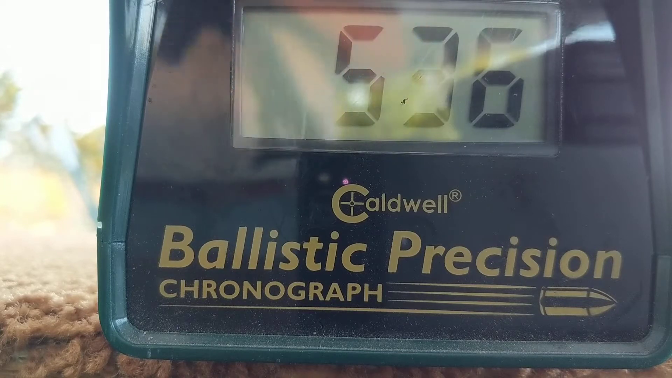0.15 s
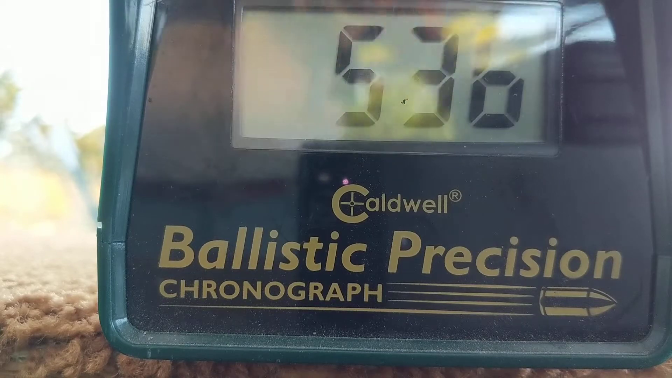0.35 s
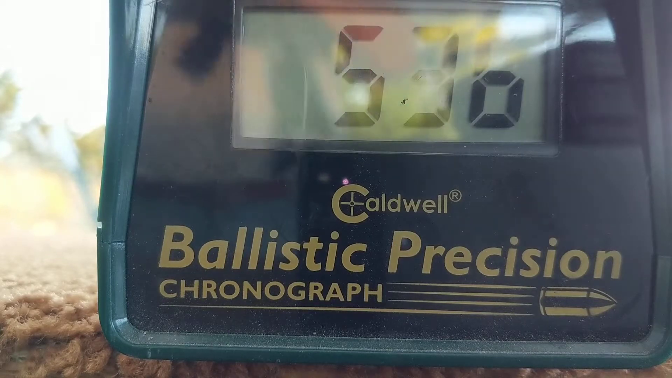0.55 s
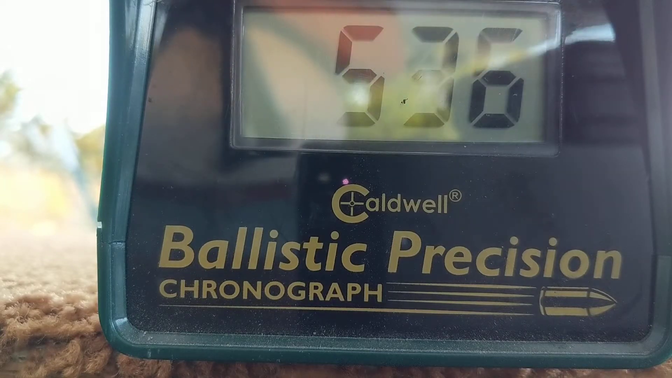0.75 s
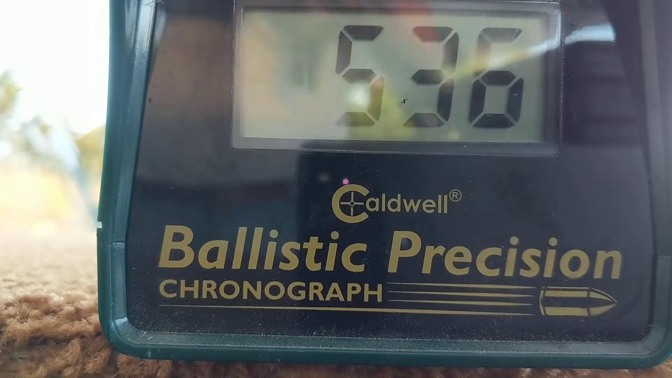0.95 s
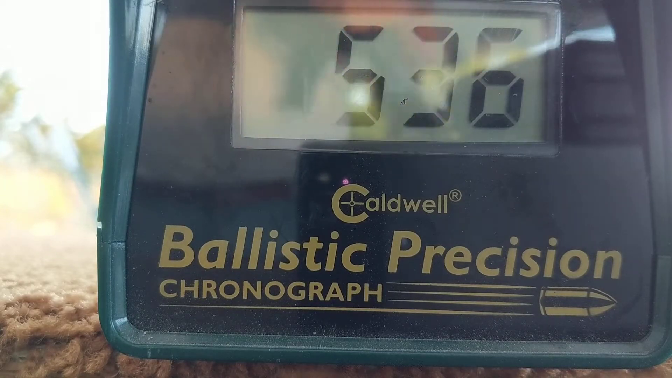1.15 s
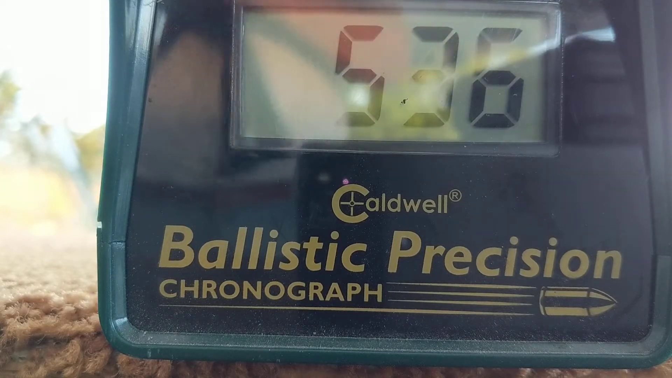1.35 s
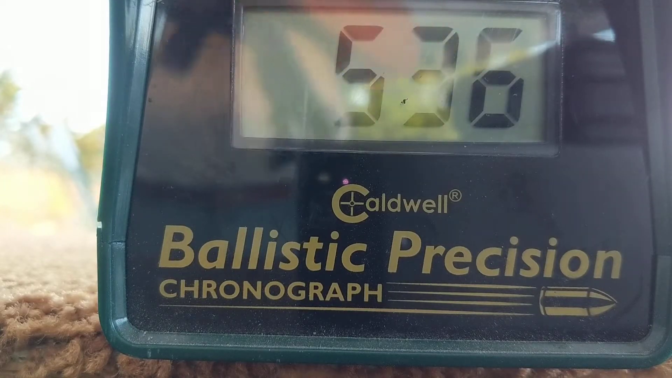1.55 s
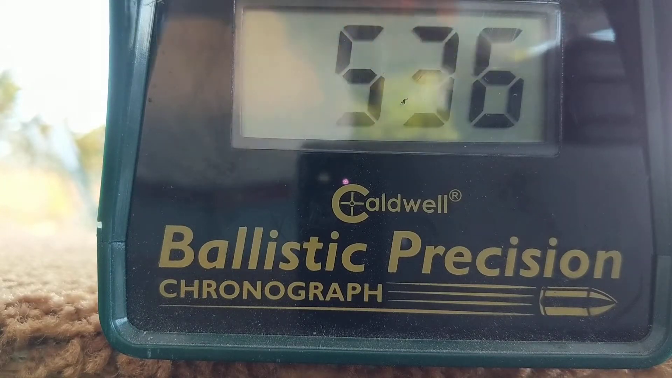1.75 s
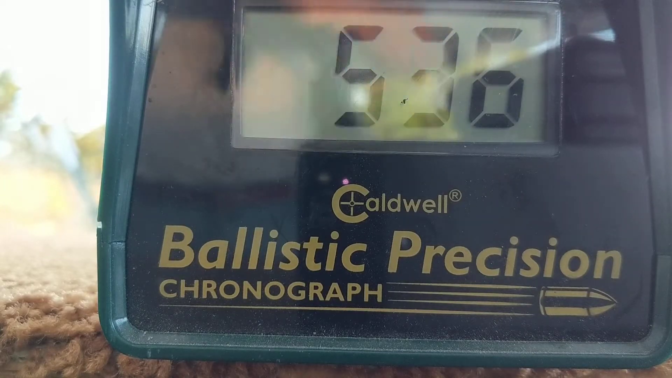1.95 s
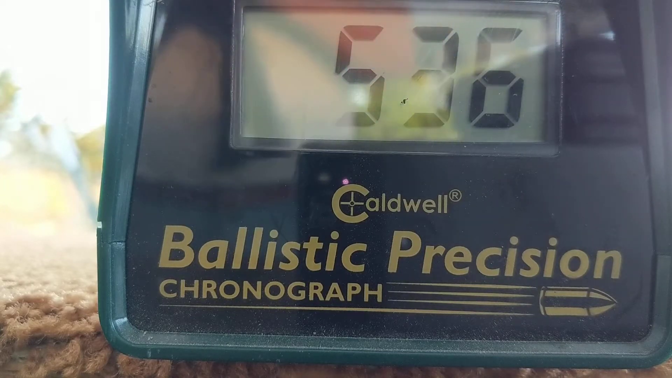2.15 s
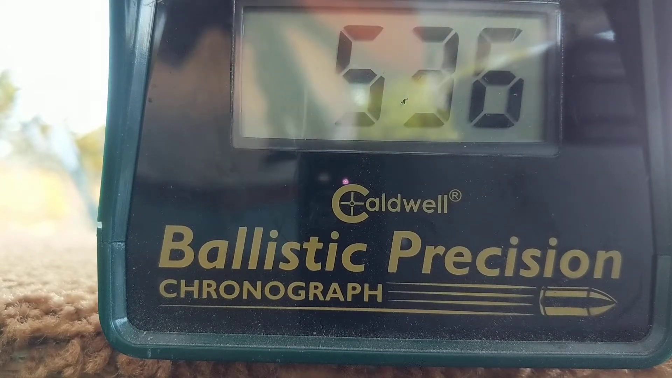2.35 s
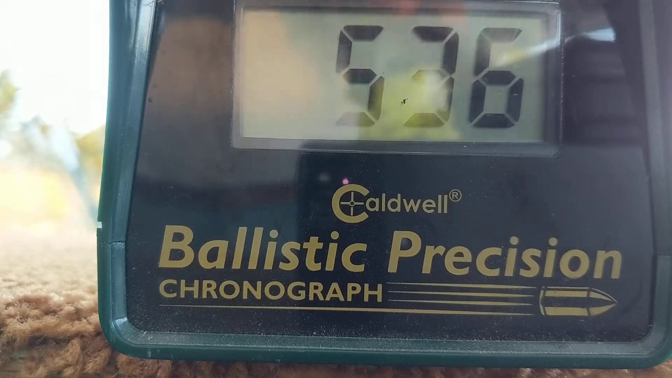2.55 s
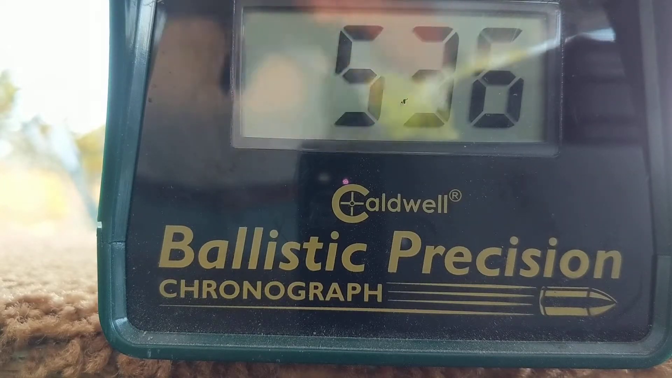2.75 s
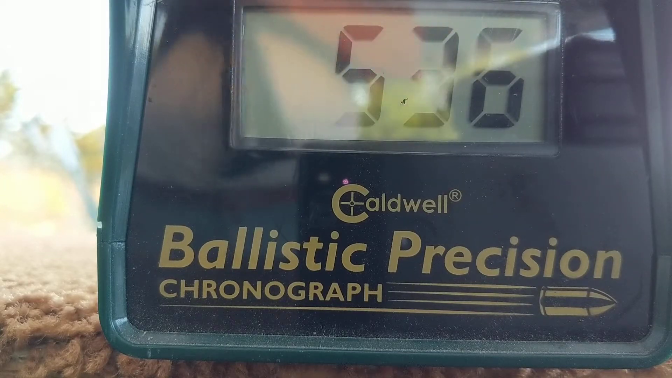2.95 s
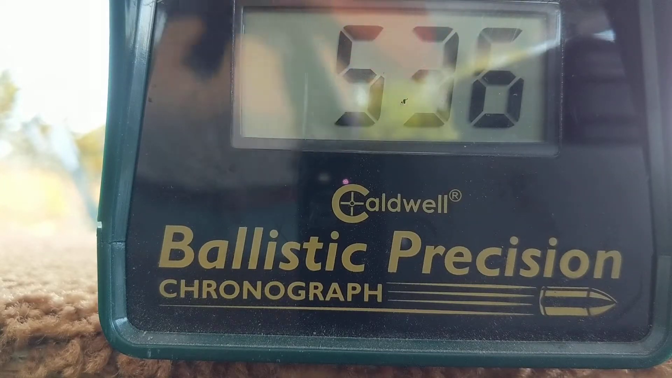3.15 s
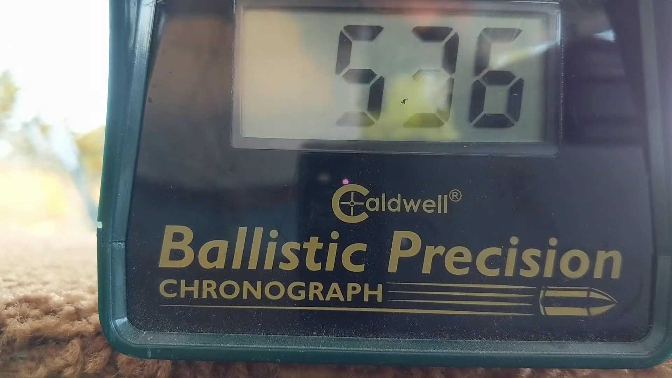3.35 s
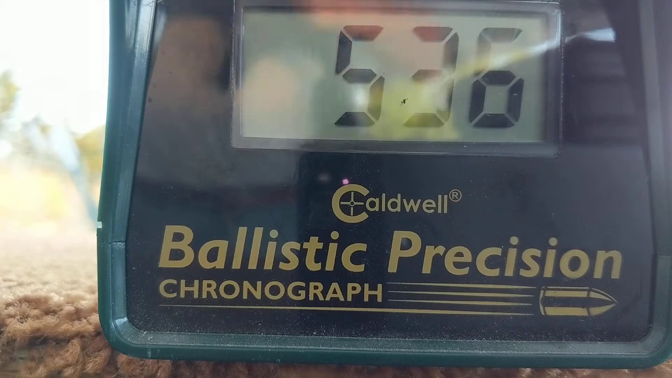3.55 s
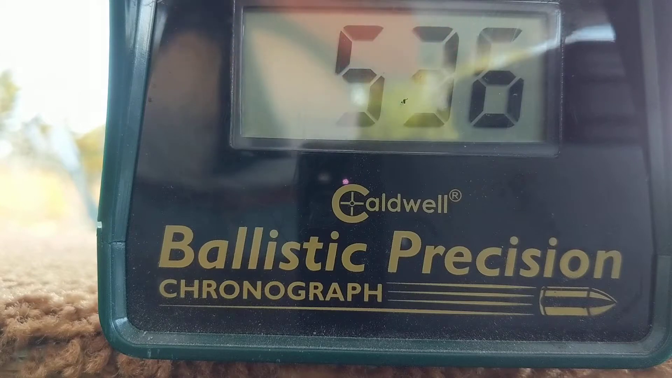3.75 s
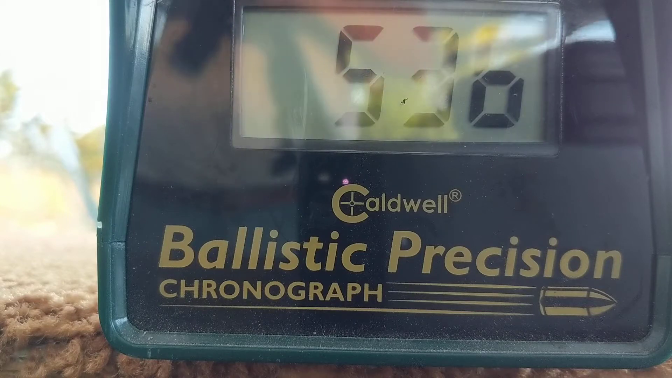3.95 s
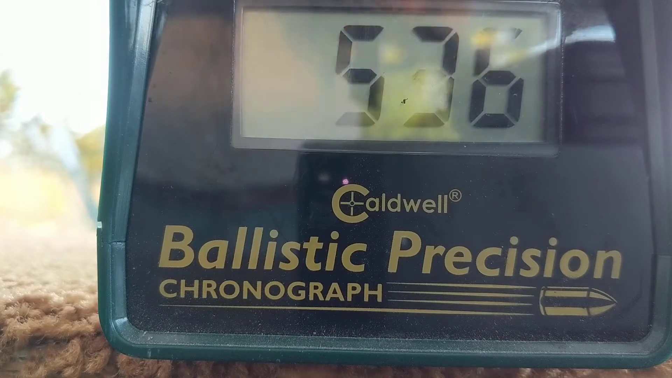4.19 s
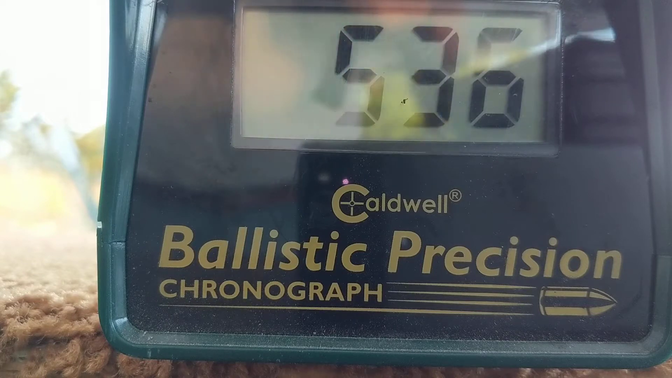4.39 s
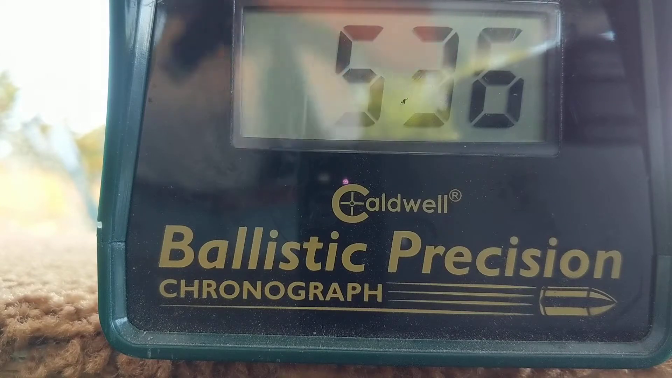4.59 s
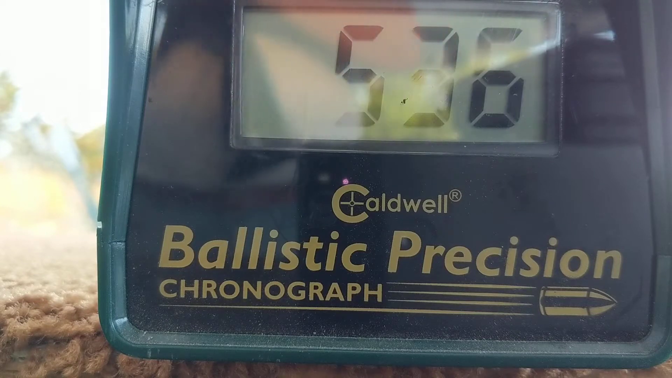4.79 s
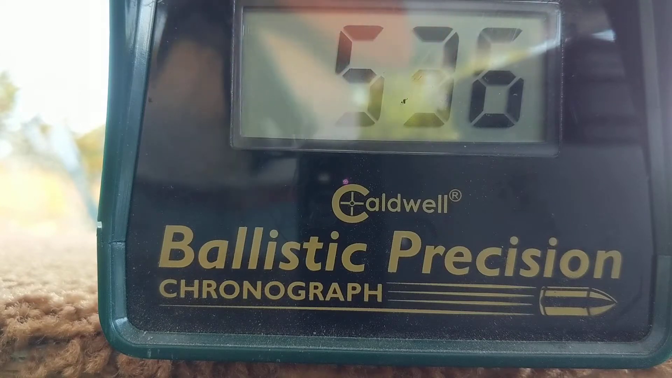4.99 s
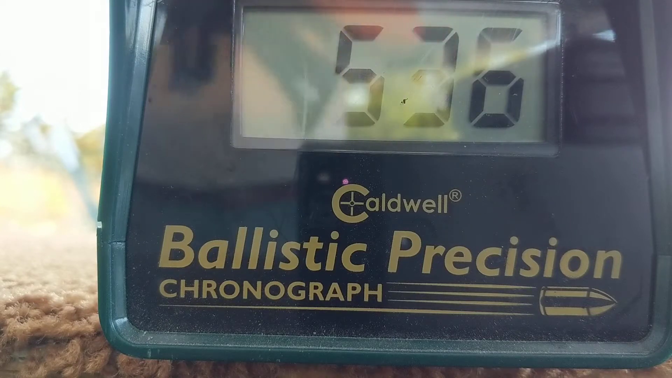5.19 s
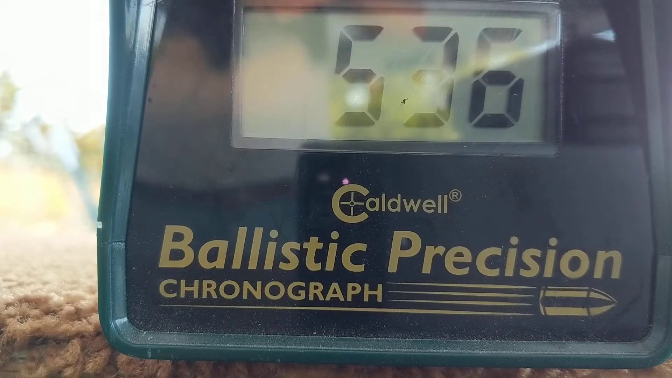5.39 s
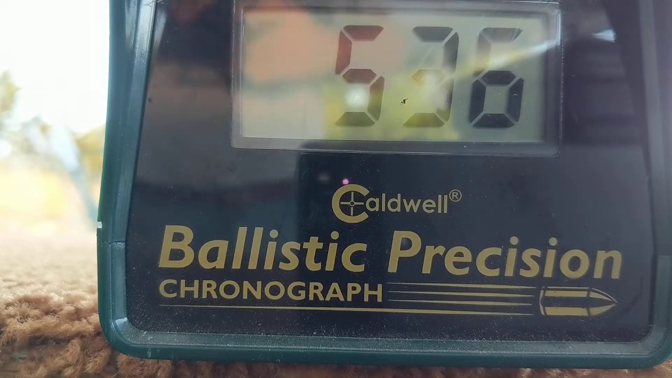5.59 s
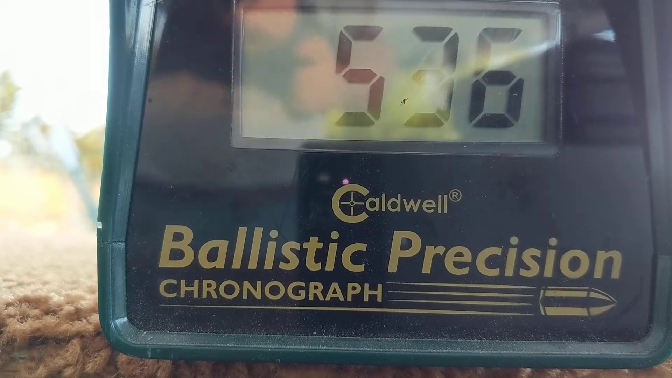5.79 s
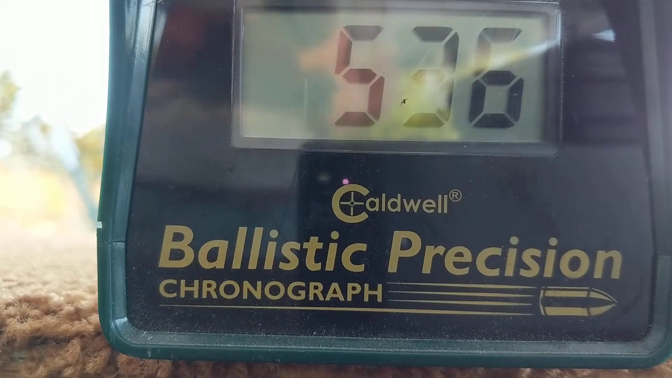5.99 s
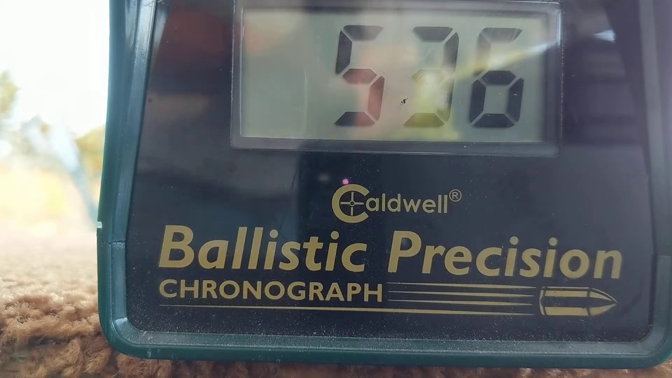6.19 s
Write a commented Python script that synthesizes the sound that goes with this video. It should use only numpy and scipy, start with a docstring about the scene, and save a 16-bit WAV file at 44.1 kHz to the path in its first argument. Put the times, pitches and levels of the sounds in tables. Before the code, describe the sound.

Sharp, evenly paced clacks of an air rifle's pump lever snapping open and slamming shut, over a quiet outdoor hush.

```python
"""Pumping an air rifle on a porch

On each stroke the lever pops off its catch, slides open to its stop and slams shut on the pump tube.
Each impact is a burst of contacts that excites the rifle's damped modes; the porch reflects it.
Friction hisses, hands and linkage tick, and a breeze rumbles on the microphone over an outdoor hush."""
import sys
import numpy as np
from scipy import signal
from scipy.io import wavfile

SR = 44100
rng = np.random.default_rng(int(sys.argv[2]) if len(sys.argv) > 2 else 0)


def int16_out(signal):
    """Quantize to a 16-bit WAV file."""
    q = np.round(np.clip(np.atleast_2d(signal).T, -1, 1) * 32767)
    wavfile.write(sys.argv[1], SR, q.astype(np.int16))


N = 274831

# lever striking the tube: start_s, level_db, rattle_t60_s, body_db, bright_db, focus_hz, thump_db, ring_db
SLAMS = [(0.0803, -2.5, .027, 4.5, -1, 608, -28, -30), (0.757, -.5, .024, .5, -0.5, 2500, -15, -32),
         (1.4647, -2, .036, -2, -2, 1760, -29, -22), (2.2553, -3, .04, 4, -3, 2070, -33, -28),
         (3.0206, -2, .033, 2, -1, 1300, -31, -28), (3.7965, -1.5, .036, 5.5, -7, 1420, -29, -25),
         (4.8738, -2.5, .042, 4, 1.5, 1810, -21, -19)]
# lever reaching its stop: start_s, level_db, rattle_t60_s, body_db, bright_db, focus_hz
OPEN_STOPS = [(.412, -25, .06, 2.5, 3, 1940), (1.104, -23, .063, -.5, 2, 2100),
              (1.834, -21.5, .05, 3, 1.5, 2100), (2.6205, -24, .06, 1.5, 1.5, 2900),
              (3.418, -26.5, .06, -.5, .5, 2350), (4.29, -25, .052, 2, 8, 2100)]
# spectrum of light metal contacts: frequency_hz, density_db
TICK_SPECTRUM = [(180, -40.5), (300, -14), (1340, -3), (2030, 0), (2570, -9), (3030, 3.5), (4300, -10.5),
                 (6000, -1), (6620, -19), (9550, -19.5), (16000, -57.5)]
SLAM_KNOCK_DELAY_S = .0033
EDGES_HZ = 22 * 2 ** np.arange(0, 9.7, 1 / 3)   # third-octave bands
CENTRES_HZ = np.sqrt(EDGES_HZ[:-1] * EDGES_HZ[1:])
BANDS = [signal.butter(2, pair, "band", fs=SR, output="sos") for pair in zip(EDGES_HZ, EDGES_HZ[1:])]


def from_db(db):
    """Decibels to amplitude ratio."""
    return 10 ** (np.asarray(db) / 20)


def unit_rms(x):
    """Normalisation to unit mean power."""
    return x / np.sqrt(np.mean(x ** 2) + 1e-20)


def butterworth(x, order, hz, kind):
    """Filtering with a maximally flat passband."""
    return signal.sosfilt(signal.butter(order, hz, kind, fs=SR, output="sos"), x)


def band_levels_db(spectrum):
    """Log-frequency interpolation of a spectrum at the band centres."""
    hz, db = np.transpose(spectrum)
    return np.interp(np.log(CENTRES_HZ), np.log(hz), db, left=-90)


def drift(rate_hz):
    """Low-passed Gaussian noise: a slow fluctuation of unit rms."""
    hop, settling = 40, 2000
    pole = np.exp(-2 * np.pi * rate_hz * hop / SR)
    white = rng.standard_normal(N // hop + settling + 2)
    slow = signal.lfilter([1], [1, -2 * pole, pole * pole], white)[settling:]
    return np.interp(np.arange(N) / hop, np.arange(len(slow)), unit_rms(slow))


def grains(size, spread_db):
    """Heavy-tailed noise: dense impulses of uneven strength."""
    return rng.standard_normal(size) * from_db(spread_db * np.minimum(rng.exponential(1, size), 5))


def ring(force, hz, t60_s):
    """Damped oscillator: a unit impulse starts a decaying sine of unit amplitude."""
    r, w = from_db(-60 / (t60_s * SR)), 2 * np.pi * hz / SR
    return signal.lfilter([0, np.sin(w)], [1, -2 * r * np.cos(w), r * r], force + 1e-18)


def resonance(x, hz, width_hz):
    """Two-pole resonator with unit gain at its peak."""
    r, w = np.exp(-np.pi * width_hz / SR), 2 * np.pi * hz / SR
    return signal.lfilter([(1 - r * r) / 2, 0, (r * r - 1) / 2], [1, -2 * r * np.cos(w), r * r], x)


def band_noise(spectrum, flicker_db, grain_db, rate_hz):
    """Noise of unit rms whose bands undergo partly correlated amplitude modulation."""
    out, common = np.zeros(N), drift(rate_hz)
    white = [grains(N, grain_db), grains(N, grain_db)]
    for k, db in enumerate(band_levels_db(spectrum)):
        if db > -89:
            flicker = 0.48 * common + drift(rate_hz)
            out += from_db(db + flicker_db * flicker) * signal.sosfilt(BANDS[k], white[k % 2])
    return unit_rms(out)


def outdoor_hush():
    """Ambient noise: a faint broadband floor that wavers slowly."""
    # outdoor background: frequency_hz, density_db
    spectrum = [(59, -33.5), (100, -5), (310, -8.5), (600, -11), (1000, -16), (1350, -18), (1870, -17),
                (2260, -31), (5670, -20.5), (7020, -36), (9270, -35.5), (15100, -36), (16500, -56.5)]
    return from_db(-65.5) * band_noise(spectrum, flicker_db=2.8, grain_db=0.2, rate_hz=6)


def breeze():
    """Turbulence at the microphone: low-frequency pressure fluctuations that rise with each gust."""
    # gust envelope: time_s, level_db
    gusts = [(0.0, -47), (0.06, -44), (0.15, -62), (0.19, -44), (0.26, -47), (0.29, -33), (0.4, -36),
             (0.43, -47), (0.6, -47), (0.635, -38), (0.72, -51), (0.83, -61), (1.05, -57), (1.8, -55),
             (2.3, -61), (2.9, -55), (3.1, -64), (3.35, -55), (3.9, -61), (4.3, -56), (5.3, -61),
             (5.65, -59), (5.75, -51), (5.85, -59), (6.23, -53)]
    # wind rumble: frequency_hz, density_db
    spectrum = [(12, -45), (20, -14.5), (48, -2), (86, 0), (128, -10.5), (168, -10.5), (340, -32),
                (500, -44), (650, -63.5), (1100, -120)]
    envelope = from_db(np.interp(np.arange(N) / SR, *np.transpose(gusts)))
    return envelope * band_noise(spectrum, flicker_db=3.3, grain_db=1.0, rate_hz=12)


def air_puffs():
    """Pressure transients: each puff is a dull kick followed by a low, damped swing back."""
    # pops of air on the microphone: start_s, strength_db
    puffs = [(0.297, -40.5), (0.344, -44), (0.375, -39), (0.628, -43), (5.474, -39.5), (5.498, -54),
             (6.082, -47)]
    impulses = np.zeros(N)
    for start_s, strength_db in puffs:
        impulses[round(start_s * SR)] = -from_db(strength_db + 11)
    pole = np.exp(-2 * np.pi * 1100 / SR)   # low-pass corner at 1100 Hz
    kick = signal.lfilter([1 - pole], [1, -2 * pole, pole * pole], impulses)
    return kick - from_db(-18) * ring(impulses, hz=65, t60_s=.05)


def friction_envelope():
    """Incoherent sources add in power: piston strokes and hand grips each swell and fade."""
    # piston travel: start_s, opening_db, closing_db, closing_fade_db_per_s
    strokes = [(.3, -55, -62, 60), (.985, -55, -56, 65), (1.71, -52, -50, 55), (2.49, -55, -56, 110),
               (3.31, -53, -59, 20), (4.19, -53, -59, 60)]
    # hands shifting on stock and lever: start_s, length_s, level_db
    grips = [(.17, .05, -62), (.57, .18, -60), (.86, .05, -61), (1.3, .12, -60), (1.56, .07, -62),
             (2.09, .02, -57), (2.36, .06, -64), (2.82, .13, -62), (3.66, .09, -65), (3.86, .08, -64),
             (4.0, .09, -60), (4.5, .2, -68), (5.18, .15, -63), (5.66, .1, -63), (5.98, .2, -68),
             (6.19, .04, -64)]
    attack_s, sag_db_per_s, release_db_per_s, resting_db = .035, 12, 140, -71
    t, power = np.arange(N) / SR, from_db(resting_db) ** 2
    for stroke, (stop_s, *_), (slam_s, *_) in zip(strokes, OPEN_STOPS, SLAMS[1:]):
        start_s, opening_db, closing_db, fade_db_per_s = stroke
        swell = np.clip((t - start_s) / attack_s, 0, 1)
        opening = swell * from_db(opening_db - sag_db_per_s * np.abs(t - start_s))
        closing = (t < slam_s) * from_db(closing_db - fade_db_per_s * np.abs(t - stop_s))
        power += np.where(t < stop_s, opening, closing) ** 2
    for start_s, length_s, level_db in grips:
        swell = np.clip((t - start_s) / attack_s, 0, 1)
        held = from_db(level_db - release_db_per_s * np.maximum(t - start_s - length_s, 0))
        power += (swell * held) ** 2
    return np.sqrt(power)


def rubbing():
    """Sliding friction: hiss and small slips of the linkage excite the pump tube's resonances."""
    # friction noise: frequency_hz, density_db
    spectrum = [(150, -28.5), (250, -0.5), (414, -1.5), (651, 3.5), (1580, -1.5), (1910, -2), (3120, -5),
                (3460, -5.5), (4260, -10.5), (6700, -21.5), (9170, -16), (16000, -48)]
    # air resonances of the pump tube: pitch_hz, width_hz, gain_db
    tube = [(1750, 250, 3.5), (2060, 250, 2), (2640, 300, 1.5), (3600, 220, 5), (5600, 400, 2)]
    slips_per_s, chatter_db = 140, -6
    hiss = band_noise(spectrum, flicker_db=3.0, grain_db=3, rate_hz=55)
    slips = (rng.random(N) < slips_per_s / SR) * grains(N, 1.8)
    chatter = sum(from_db(db) * ring(slips * rng.standard_normal(N), hz, .018) for hz, _, db in tube[:4])
    rush = hiss + sum(from_db(db) * resonance(hiss, hz, width_hz) for hz, width_hz, db in tube)
    return friction_envelope() * unit_rms(unit_rms(rush) + from_db(chatter_db) * unit_rms(chatter))


def impacts(events, spectrum, touch_db, touch_t60_s, delay_s, knock_s, uneven_db, ring_db, focus_db):
    """Impact excitation: a first touch, then a knock that rattles out and rings the rifle's modes."""
    # modes of tube, lever and stock: pitch_hz, level_db, t60_s
    modes = [(603, -32, .025), (1105, -37, .45), (1320, -27, .025), (1590, -11, .07), (1950, -25, .03),
             (2580, -28, .03), (2900, -29, .03), (3650, -27, .025)]
    out, t = np.zeros(N + SR), np.arange(SR // 3) / SR
    bass = CENTRES_HZ < 1100
    treble = np.clip(np.log(CENTRES_HZ / 3000) / np.log(6500 / 3000), 0, 1)
    kick = from_db(14) * (np.arange(len(t)) == round(delay_s * SR))   # the knock's impulse on the modes
    touch = from_db(touch_db - 60 * t / touch_t60_s)
    for event, ringing_db in zip(events, np.broadcast_to(ring_db, len(events))):
        start_s, level_db, rattle_t60_s, body_db, bright_db, focus_hz = event[:6]
        knock = (t >= delay_s) * from_db(-60 * np.maximum(t - delay_s - knock_s, 0) / rattle_t60_s)
        force = (touch + knock) * grains(len(t), 3.5)
        force[0] += 4.0 * touch[0]   # the very first contact is a hard click
        focus = np.exp(-(np.log2(CENTRES_HZ / focus_hz) / 0.2) ** 2)   # the struck part's pitch region
        colour_db = band_levels_db(spectrum) + body_db * bass + bright_db * treble + focus_db * focus
        gains = from_db(colour_db + rng.normal(0, uneven_db, len(BANDS)))
        crack = sum(gain * (-1) ** k * signal.sosfilt(BANDS[k], force[:SR // 8])
                    for k, gain in enumerate(gains) if gain > 1e-3)
        crack = np.pad(crack / np.abs(crack).max(), (0, len(t) - len(crack)))
        ringing = sum(from_db(db + ringing_db + rng.normal(0, 2.5)) * ring(kick, hz, t60_s)
                      for hz, db, t60_s in modes)
        at = round(start_s * SR)
        out[at:at + len(t)] += from_db(level_db) * (crack + ringing)
    return out[:N]


def linkage_ticks():
    """Light impacts: hands and linkage tick, and the lever rebounds once from its open stop."""
    # small contacts: start_s, level_db, rattle_t60_s, body_db, bright_db, focus_hz
    ticks = [(0.315, -36, .05, -2, -3, 2280), (0.325, -34, .09, -10, 9, 3650),
             (0.46, -38, .05, -2, 0, 1680), (0.604, -48, .06, -2, 13, 3470), (0.699, -44, .05, 8, 4, 732),
             (1.007, -40, .04, -8, -1, 2000), (1.017, -36, .055, -12, -1, 3560),
             (1.16, -41, .04, -8, 0, 1700), (1.22, -46.5, .05, -1, -6, 1680),
             (1.284, -50, .03, 8, -12, 800), (1.368, -42.5, .06, -2, 1, 1990),
             (1.742, -38, .05, -2, 0, 3800), (1.754, -37, .08, -2, 1, 3550), (2.095, -32, .06, 0, 7, 2160),
             (2.127, -45, .03, 3, 0, 1100), (2.483, -38, .05, 2, -4, 1950), (2.512, -38, .04, 0, -5, 2830),
             (2.531, -35.5, .05, -3, -10, 2320), (2.542, -36, .05, -11, 0, 2720),
             (2.695, -41, .05, -2, -4.5, 1570), (2.861, -50.5, .06, -4, -2, 1900),
             (3.111, -24, .017, 4, 1.5, 2760), (3.29, -47, .04, -2, -6, 1830),
             (3.323, -36, .04, -9, 9, 1820), (3.486, -41.5, .05, -4, -11, 3700),
             (3.668, -52, .03, -4, -4, 3360), (3.701, -48, .055, -6, 4, 2030),
             (4.023, -44.5, .05, -1, 4, 1180), (4.182, -39, .03, 2, -4, 1180),
             (4.209, -36.5, .09, -7, 1, 2570), (4.39, -44.5, .06, -12, -5, 1560),
             (4.507, -46.5, .05, -2, 0, 2220), (4.58, -48.5, .04, -1, 12, 3500),
             (4.712, -51, .04, -2, -1, 1550), (4.794, -50, .04, 1, -1, 1540),
             (5.074, -44, .03, 7, -18, 1300), (5.108, -48, .02, 2, -18, 1290),
             (5.157, -52, .02, 6, -12, 1100), (5.216, -43, .055, -7, 10, 3320),
             (5.239, -37, .05, 2, 8, 2660), (5.643, -38, .02, 2, -14, 1550), (5.709, -47, .05, 9, -14, 600),
             (5.759, -47.5, .06, 8, -8, 757), (5.863, -39, .03, -3, 0.5, 1765),
             (5.985, -45.5, .03, -1, -1.5, 2070)]
    bounce_s, bounce_db = .031, -11
    bounces = [(start_s + bounce_s, db + bounce_db, *timbre) for start_s, db, *timbre in OPEN_STOPS]
    return impacts(ticks + bounces, TICK_SPECTRUM, touch_db=7, touch_t60_s=.046, delay_s=.0035,
                   knock_s=.0027, uneven_db=2.5, ring_db=-22, focus_db=11)


def lever_stops():
    """Sudden deceleration: the lever clacks against its stop at full reach."""
    return impacts(OPEN_STOPS, TICK_SPECTRUM, touch_db=-4, touch_t60_s=.03, delay_s=.006,
                   knock_s=.002, uneven_db=1.0, ring_db=-27, focus_db=3.5)


def catch_pops():
    """Release of elastic energy: the lever snaps off its catch with a sharp first click."""
    # catch releases: start_s, level_db, rattle_t60_s, body_db, bright_db, focus_hz
    pops = [(0.217, -16, .07, 0, 0.5, 1580), (0.913, -20.5, .07, 2.5, -1.5, 2480),
            (1.6395, -22, .08, 5, -1, 5550), (2.4287, -20, .075, 6, -1.5, 1710),
            (3.208, -18.5, .07, 2, -1, 1560), (4.09, -15.5, .06, 3, 0, 2900)]
    # snap of the catch: frequency_hz, density_db
    spectrum = [(240, -105), (400, -33.5), (852, -27), (1580, -5), (1960, -9), (2930, -4.5), (4380, -19.5),
                (5430, -4.5), (7280, -20), (9040, -17.5), (16000, -51)]
    return impacts(pops, spectrum, touch_db=8.5, touch_t60_s=.028, delay_s=.0045,
                   knock_s=.0008, uneven_db=1.5, ring_db=-21, focus_db=3.5)


def stock_thumps():
    """Momentum transfer: each slam jolts the stock into a low, heavily damped vibration."""
    impulses = np.zeros(N)
    for start_s, *_, thump_db, _ in SLAMS:
        impulses[round((start_s + SLAM_KNOCK_DELAY_S) * SR)] = from_db(thump_db)
    push = signal.lfilter([.01], [1, -.99], impulses)   # spread over a few milliseconds
    return ring(push, hz=85, t60_s=.04)


def lever_slams():
    """Hard collision: brief contacts of lever on tube radiate a loud broadband crack."""
    # crack of the closing lever: frequency_hz, density_db
    spectrum = [(35, -45), (60, -21), (250, -26), (540, -5), (1340, -0.5), (2250, 1.5), (2580, -4.5),
                (3120, -0.5), (4860, -3.5), (6900, -17), (9130, -3.5), (12100, -34.5), (14200, -29.5),
                (16000, -37)]
    return impacts(SLAMS, spectrum, touch_db=-4.5, touch_t60_s=.084, delay_s=SLAM_KNOCK_DELAY_S,
                   knock_s=.0052, uneven_db=0, ring_db=[slam[-1] for slam in SLAMS], focus_db=3)


def porch_reflections(x):
    """Reverberation from floor, wall and roof dies fast; one dull echo returns from a far wall."""
    onset_s, end_s, t60_s, treble_t60_s, reverb_db = .018, .078, .135, .14, -13.5
    echo_s, echo_db = .108, -46.5
    t = np.arange(SR // 4) / SR
    scatter = grains(len(t), 2.7) * np.clip(t / onset_s, 0, 1) * np.exp(-(t / end_s) ** 4)
    dull = butterworth(scatter, 2, 5000, "low")
    tail = dull * from_db(-60 * t / t60_s) + (scatter - dull) * from_db(-60 * t / treble_t60_s)
    tail = butterworth(tail, 1, 550, "high")   # lows escape through the open sides
    reverb = from_db(reverb_db) * signal.fftconvolve(x, tail / np.sqrt(np.sum(tail ** 2)))[:N]
    echo = butterworth(x + reverb, 2, [700, 4000], "band")
    return reverb + from_db(echo_db) * np.pad(echo, (round(echo_s * SR), 0))[:N]


def scene():
    """Superposition of the rifle, its reflections and the outdoor air, in one channel."""
    rifle = lever_slams() + catch_pops() + lever_stops() + linkage_ticks()
    air = breeze() + outdoor_hush() + air_puffs()
    return (air + rifle + porch_reflections(rifle) + stock_thumps() + rubbing())[None]


def microphone(x):
    """Frequency response: a port resonance lifts the treble, and deep bass rolls off."""
    lifted = x + from_db(4.5) * resonance(x, hz=9300, width_hz=870)
    return butterworth(lifted, 4, 36, "high")


def record(dry):
    """Dynamic compression: gain ducks after loud impacts; peaks saturate and the top treble is cut."""
    threshold_db, slope, attack_s, release_db_per_s = -22, 0.35, .018, 59
    ceiling, cutoff_hz = .8, 16850
    picked_up = microphone(dry)
    reduction_db = slope * np.maximum(20 * np.log10(np.abs(picked_up[0]) + 1e-9) - threshold_db, 0)
    recovery_db = release_db_per_s * np.arange(N) / SR
    held_db = np.maximum.accumulate(reduction_db + recovery_db) - recovery_db   # decaying peak hold
    pole = np.exp(-1 / (attack_s * SR))
    ducked = picked_up * from_db(-signal.lfilter([1 - pole], [1, -pole], held_db))
    rounded = ceiling * np.tanh(ducked / ceiling)
    return signal.sosfilt(signal.cheby2(14, 60, cutoff_hz, fs=SR, output="sos"), rounded)


dry = scene()
out = record(dry)
int16_out(out)
```